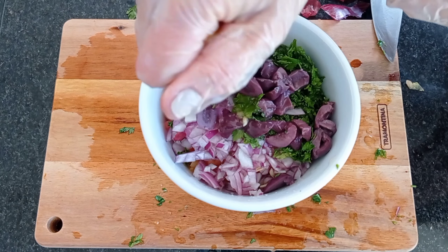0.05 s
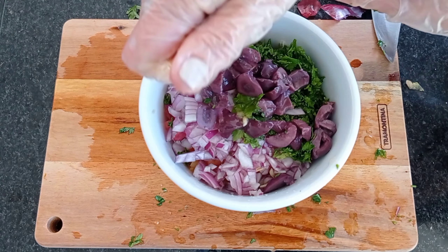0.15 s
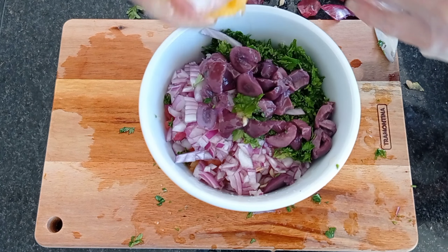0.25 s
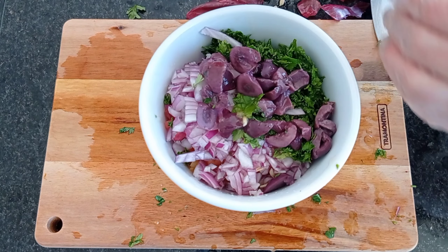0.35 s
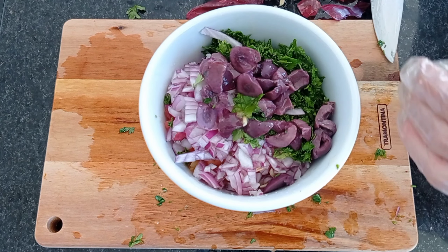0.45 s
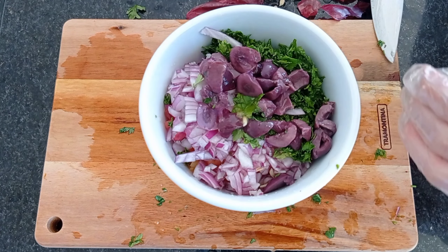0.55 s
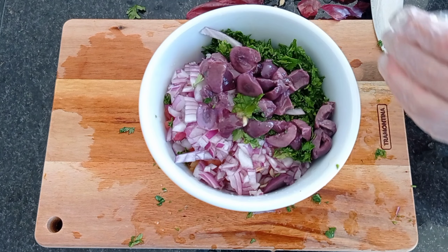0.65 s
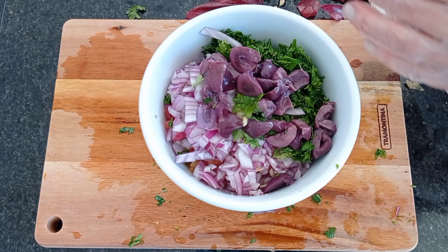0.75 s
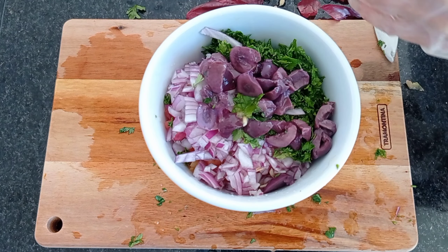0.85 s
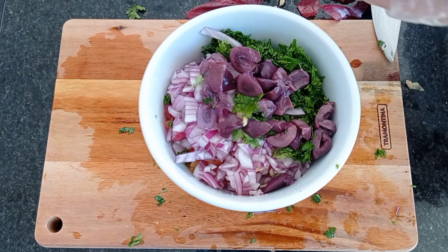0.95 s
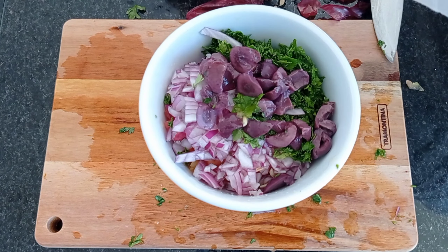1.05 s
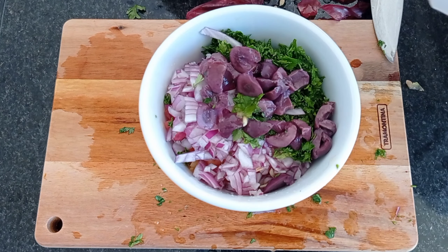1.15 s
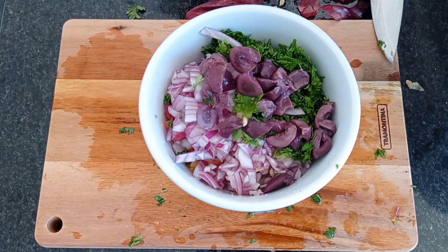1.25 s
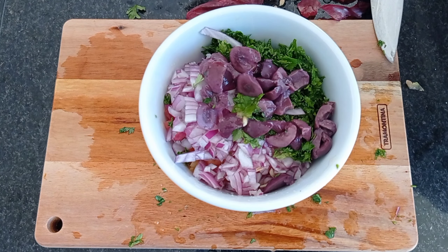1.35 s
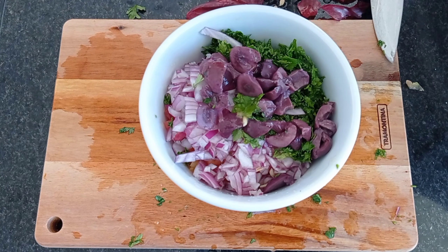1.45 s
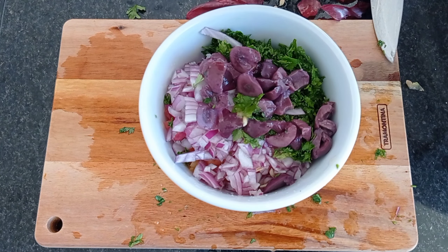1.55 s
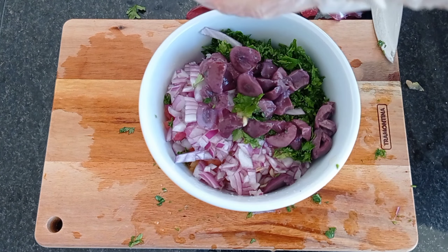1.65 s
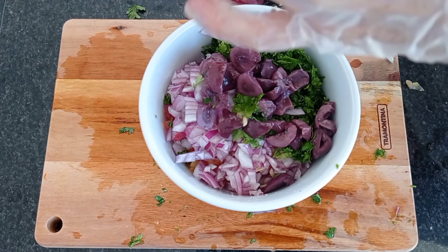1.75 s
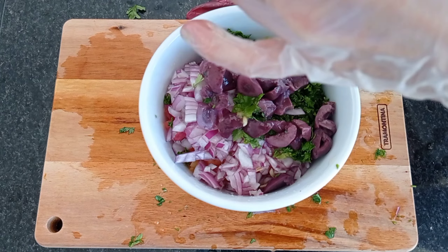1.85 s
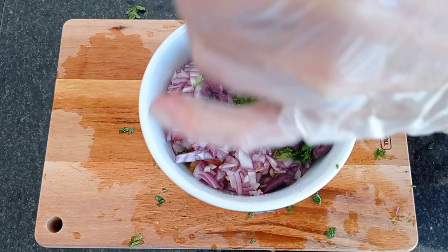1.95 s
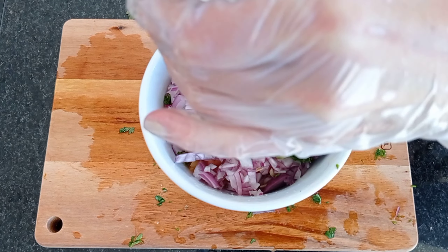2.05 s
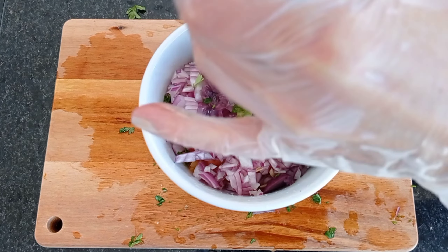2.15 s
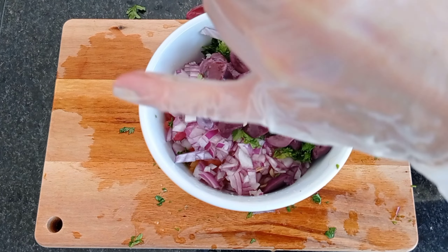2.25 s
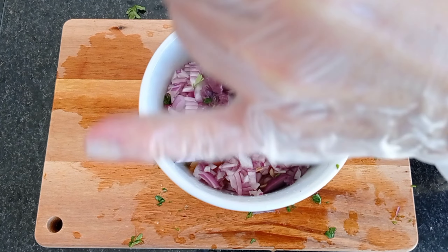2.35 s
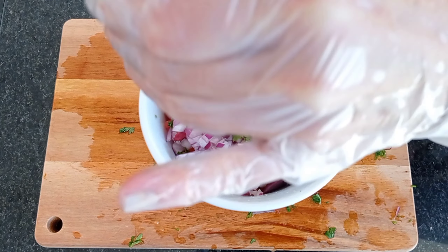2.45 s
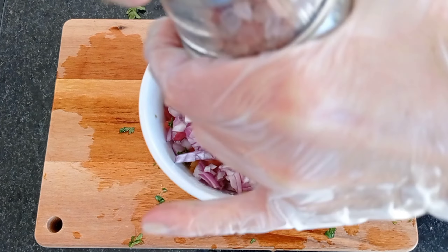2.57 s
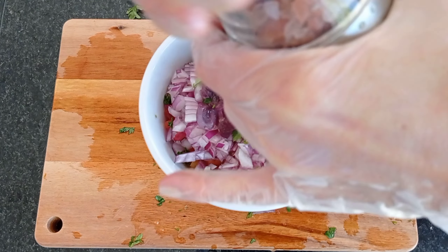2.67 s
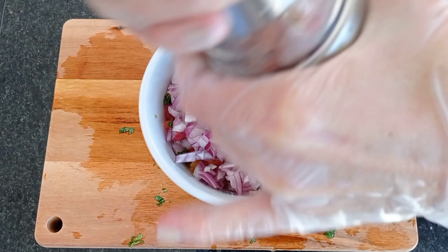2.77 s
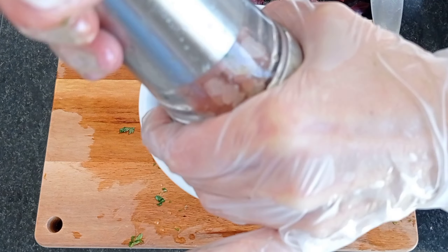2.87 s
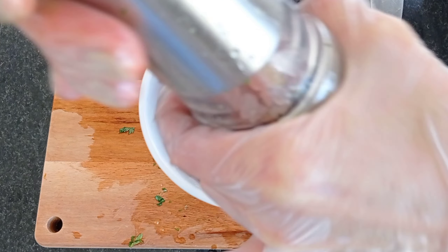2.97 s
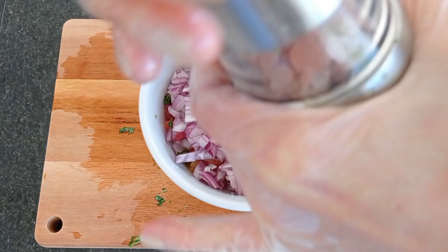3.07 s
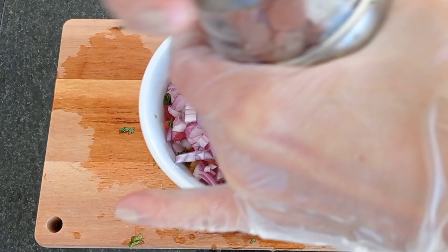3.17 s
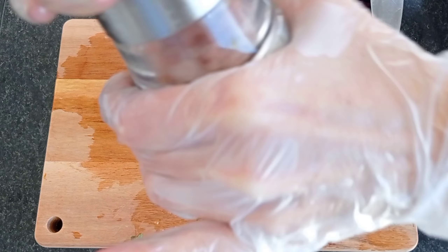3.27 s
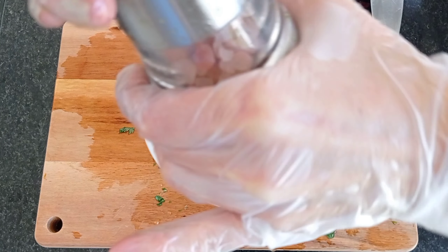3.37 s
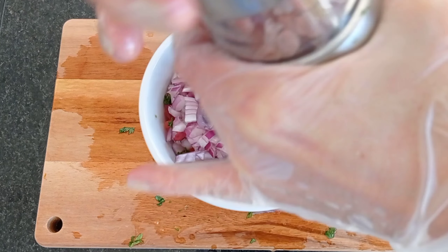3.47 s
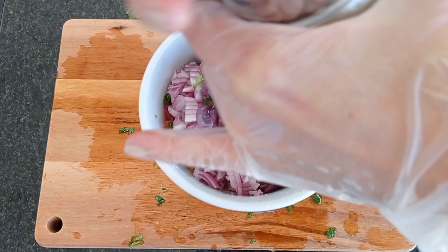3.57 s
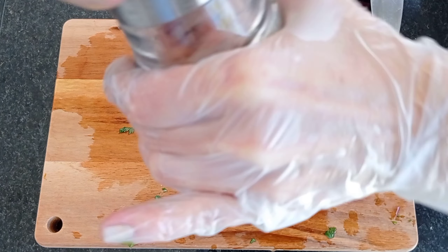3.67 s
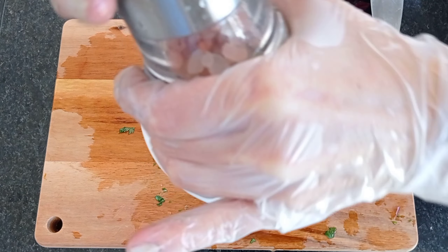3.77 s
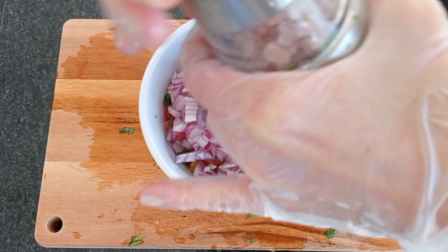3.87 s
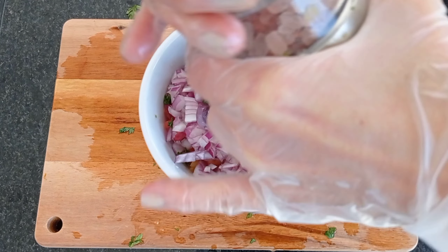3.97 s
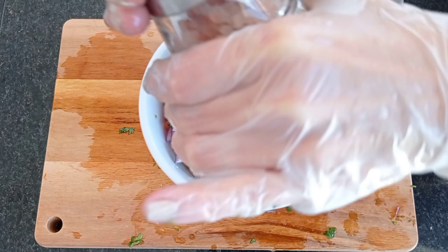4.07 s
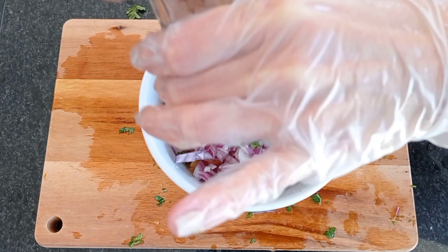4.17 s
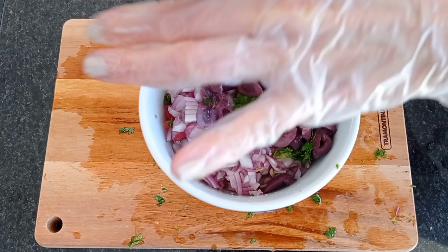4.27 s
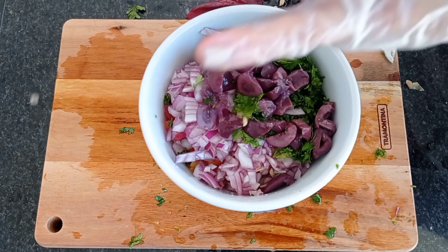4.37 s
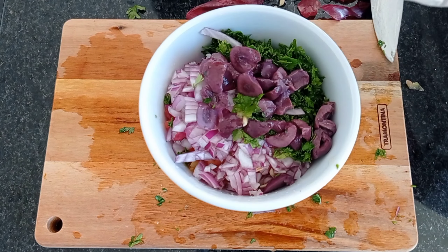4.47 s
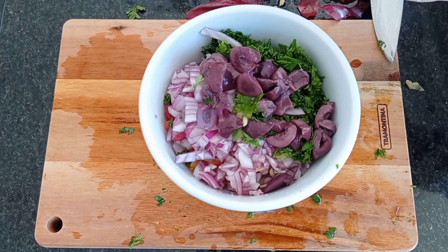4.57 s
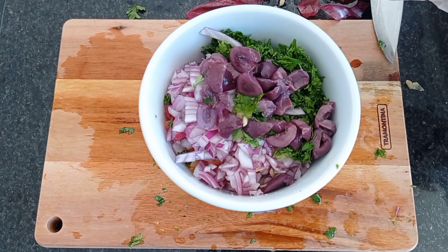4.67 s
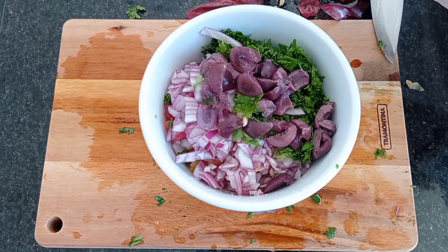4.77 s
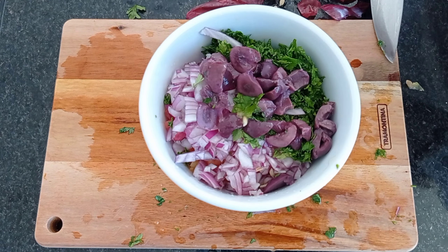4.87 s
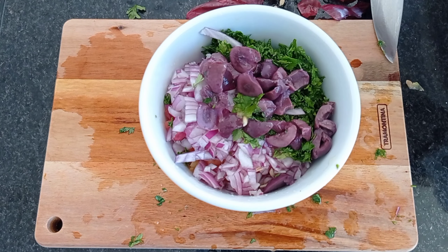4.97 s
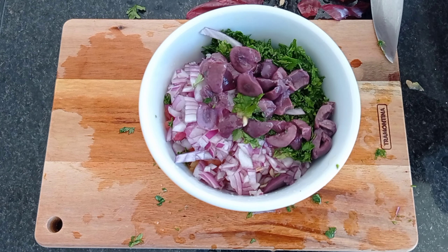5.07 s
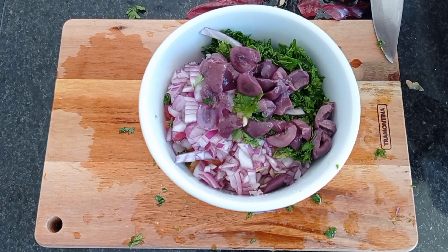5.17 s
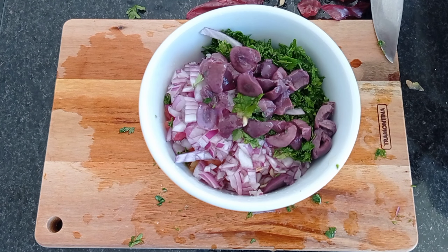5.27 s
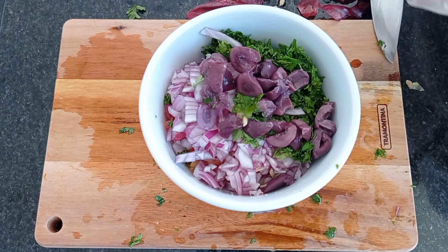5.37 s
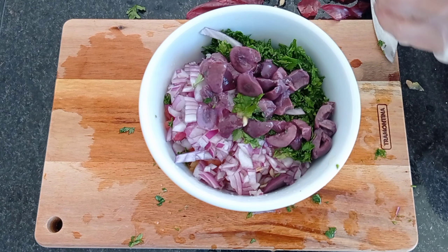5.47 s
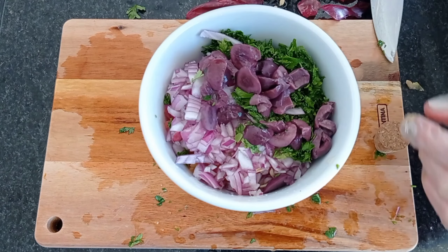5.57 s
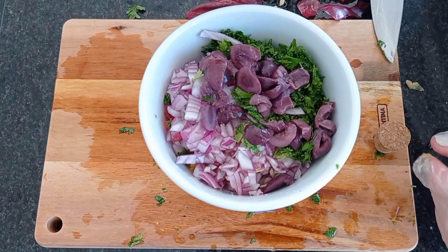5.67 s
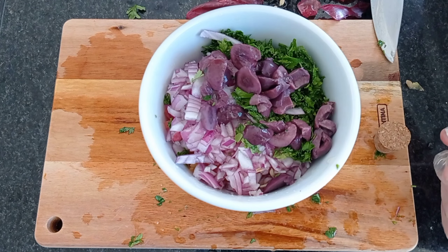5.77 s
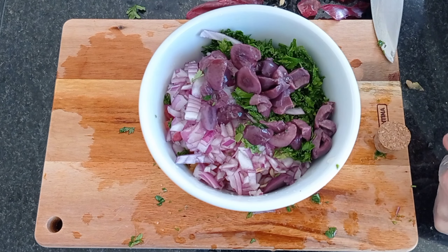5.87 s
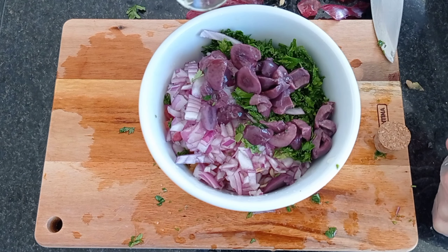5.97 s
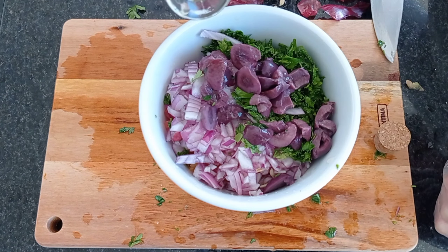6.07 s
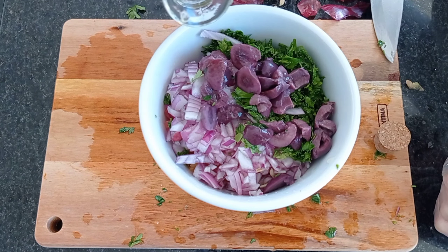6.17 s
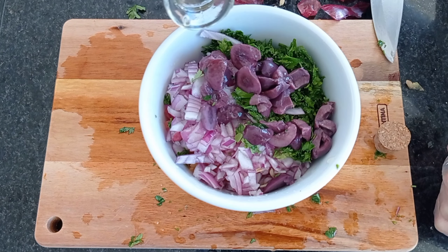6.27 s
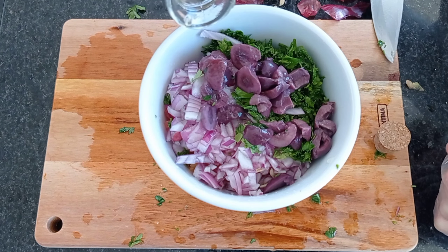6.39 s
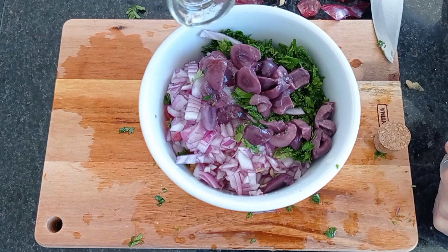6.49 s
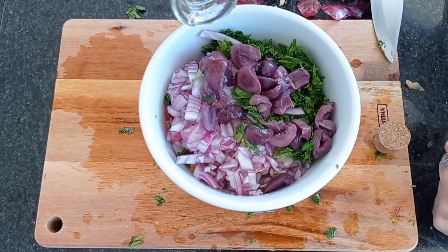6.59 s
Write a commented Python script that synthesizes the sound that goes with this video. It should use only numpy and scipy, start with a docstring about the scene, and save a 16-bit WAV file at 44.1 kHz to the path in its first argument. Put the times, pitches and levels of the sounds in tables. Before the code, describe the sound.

Gloved hands rustle and snap, uncap a salt mill with ringing clinks, twist it five times, then softly pop a cork.

```python
"""Salt mill at a kitchen counter

Close to a small covered microphone that hisses faintly, in a quiet kitchen, gloved hands pick up a salt mill,
pull off its ticking, ringing metal cap and give it five twists over a bowl; crystals crack between the burrs.
The thin plastic gloves rustle and snap as they crease, and squeak as they slip. At the end a cork pops from a
small bottle, which bumps the stone counter."""
import sys
import numpy as np
from scipy import signal
from scipy.fft import rfft, irfft
from scipy.io import wavfile

SR = 44100
rng = np.random.default_rng(int(sys.argv[2]) if len(sys.argv) > 2 else 0)


def wav_record(signal):
    """Record a signal, one row per channel, as 16-bit PCM in the file named by sys.argv[1]."""
    frames = np.transpose(np.atleast_2d(signal))
    bounded = np.clip(frames, -1, 1)
    # unit amplitude maps onto the largest positive 16-bit level
    quanta = np.round(bounded * 32767).astype(np.int16)
    wavfile.write(sys.argv[1], SR, quanta)


N = 292383
TIME = np.arange(N) / SR


def from_db(db):
    """Decibels to gain."""
    return 10 ** (np.asarray(db) / 20)


def rms_one(x):
    """Scale to rms 1."""
    return x / np.sqrt(np.mean(x ** 2) + 1e-20)


def coloured(x, spectrum):
    """Give a white signal a spectrum at rms 1; minimum phase keeps clicks from sounding early."""
    hz, level_db = np.transpose(spectrum)
    grid_hz = np.linspace(0, SR / 2, 2049)
    gain = from_db(np.interp(np.log(grid_hz + 1), np.log(hz), level_db))
    cepstrum = irfft(np.log(gain))
    cepstrum[1:2048] *= 2
    cepstrum[2049:] = 0
    impulse = irfft(np.exp(rfft(cepstrum)))
    return rms_one(signal.fftconvolve(x, impulse)[:N])


def ring(clicks, hz, t60):
    """A unit click sets a sine of height 1 ringing."""
    r, w = from_db(-60 / (t60 * SR)), 2 * np.pi * hz / SR
    return signal.lfilter([0, np.sin(w)], [1, -2 * r * np.cos(w), r * r], clicks + 1e-18)


def resonance(x, hz, width_hz):
    """Band-pass with gain 1 at its peak."""
    r, w = np.exp(-np.pi * width_hz / SR), 2 * np.pi * hz / SR
    return signal.lfilter(np.array([1, 0, -1]) * (1 - r * r) / 2, [1, -2 * r * np.cos(w), r * r], x)


def grains(per_s, spread_db):
    """Random clicks of uneven size."""
    sizes = from_db(spread_db * np.minimum(rng.exponential(1, N), 4)) * rng.choice([-1, 1], N)
    return rms_one(sizes * (rng.random(N) < per_s / SR))


def strikes(times, levels_db):
    """Clicks at given times."""
    clicks = np.zeros(N)
    clicks[np.round(np.asarray(times) * SR).astype(int)] = from_db(levels_db)
    return clicks


def flicker(per_s, depth_db):
    """A gain that wanders at random."""
    steps = from_db(depth_db * rng.standard_normal(int(per_s * N / SR) + 2))
    return np.interp(TIME * per_s, np.arange(len(steps)), steps)


def swell(start_s, end_s, swell_s, fade_s):
    """A gain that rises 20 dB per swell_s, holds 1 from start to end, then falls 20 dB per fade_s."""
    before = np.maximum(start_s - TIME, 0) / swell_s
    after = np.maximum(TIME - end_s, 0) / fade_s
    return from_db(-20 * (before + after))


# Noise floor of the microphone itself: f/Hz, relative level/dB
HISS_SPECTRUM = [(15, -32.5), (25, -15), (45, -2.5), (301, -10.5), (335, -11.5), (439, -17), (1400, -28.5),
                 (1610, -17), (1890, -22), (5570, -27), (12900, -19), (16000, -20)]
def hiss():
    """Steady noise, far below the hands."""
    return from_db(-73.5) * coloured(rng.standard_normal(N), HISS_SPECTRUM)


def room(x, t60=0.43, gap_s=0.003):
    """The kitchen walls return a dense, decaying tail after a short gap."""
    t = np.arange(SR // 2) / SR
    tail = rng.standard_normal(len(t)) * from_db(-60 * t / t60) * (t > gap_s)
    return signal.fftconvolve(x, tail / np.sqrt(np.sum(tail ** 2)))[:N]


# Hands never quite still: t/s, bright rustle/dB, dull rustle/dB, palm rub/dB
FIDGETING = [(0.0, -60, -70, -64.5), (1.14, -73, -76, -77), (1.33, -62, -49, -64), (1.64, -51.5, -55, -60),
             (2.05, -51.5, -50.5, -57.5), (2.2, -67, -60, -71), (2.51, -66.5, -80, -72),
             (2.86, -63, -61.5, -75.5), (3.03, -63.5, -76, -82), (3.6, -65.5, -77, -76.5),
             (3.97, -58.5, -75.5, -90), (4.67, -78.5, -82, -80), (5.0, -82.5, -80.5, -83),
             (5.22, -76, -79, -85), (5.47, -76, -85, -77.5), (5.89, -72.5, -77.5, -74.5),
             (6.09, -79.5, -82, -83.5), (6.63, -79, -81, -81)]
# Grasps and jolts: peak t/s, swell/s, fade/s, bright rustle/dB, dull rustle/dB, palm rub/dB
HAND_MOVES = [(.14, 0.013, 0.15, -42, -63, -62), (.24, 0.11, 0.043, -53, -68, -62),
              (.34, 0.06, 0.05, -71, -63, -76), (.658, 0.033, 0.14, -57.5, -68, -81),
              (.754, 0.14, 0.17, -99, -69, -58.5), (.89, 0.049, 0.19, -69, -73.5, -68.5),
              (1.127, 0.0086, 0.073, -55.5, -65, -54.5), (1.201, .005, 0.085, -34.5, -59, -44),
              (1.368, 0.019, 0.039, -37, -44, -50.5), (1.491, 0.0038, 0.093, -45, -43, -45.5),
              (2.035, 0.1, 0.16, -42.5, -41.5, -47.5), (2.189, 0.11, 0.043, -42, -40.5, -51),
              (2.322, 0.0037, 0.023, -64, -88, -42.5), (2.452, 0.076, 0.048, -39.5, -40, -54),
              (2.575, 0.0043, 0.081, -47.5, -60, -65), (2.77, 0.014, 0.044, -54, -61.5, -64),
              (2.92, 0.081, 0.043, -46, -70, -44), (3.197, 0.0061, 0.031, -49, -64, -41.5),
              (3.448, 0.0036, 0.041, -48, -59, -83), (3.31, 0.095, 0.17, -53, -71, -62.5),
              (3.728, 0.16, 0.057, -51, -63, -59.5), (3.99, 0.1, 0.034, -63, -92.5, -85),
              (4.098, 0.0084, 0.039, -40, -76, -35.5), (4.45, 0.014, 0.097, -97, -92, -67),
              (4.64, 0.3, 0.11, -95, -90, -63.5), (4.74, .15, 0.024, -91, -85, -70),
              (5.029, .004, 0.082, -51.5, -88, -39), (5.165, 0.11, 0.036, -75, -90, -56.5),
              (5.397, 0.16, 0.17, -65.5, -83, -86), (5.728, 0.11, 0.27, -74, -90, -66),
              (5.94, 0.054, 0.031, -61.5, -78, -65), (6.07, 0.16, 0.027, -72.5, -86, -76)]
def hands():
    """Fidgeting and grasping set three gains: bright rustle, dull rustle and palm rub."""
    times, *curves_db = np.transpose(FIDGETING)
    gains = from_db([np.interp(TIME, times, curve) for curve in curves_db])
    for s, swell_s, fade_s, *levels_db in HAND_MOVES:
        gains += from_db(levels_db)[:, None] * swell(s, s, swell_s, fade_s)
    return gains


def panels(clicks, low_hz, high_hz, cycles, patchy_db, tilt, count=9):
    """Clicks fall on small panels of glove film, each with its own pitch and its own busy moments."""
    dealt = rng.integers(0, count, N)
    out = np.zeros(N)
    for k, hz in enumerate(np.geomspace(low_hz, high_hz, count)):
        own_clicks = clicks * (dealt == k) * flicker(9, patchy_db)
        out += rms_one(ring(own_clicks, hz, cycles / hz)) * hz ** tilt
    return rms_one(out)


# Glove film rustling, close up: f/Hz, relative level/dB
FILM_SPECTRUM = [(530, -41.5), (900, -8), (1470, -24.5), (2330, 7), (2990, -4.5), (3280, -14.5),
                 (6460, 6.5), (9180, -24), (13500, -29.5)]
# Palms rubbing: f/Hz, relative level/dB
PALM_SPECTRUM = [(18, -49), (30, -24), (134, -6.5), (289, -16.5), (517, 5.5), (788, -13.5), (2000, -25),
                 (2600, -47.5), (4400, -120)]
def gloves(bright_gain, dull_gain, rub_gain):
    """Fine creases crackle densely in small and large panels of film; the palms rub underneath."""
    film_noise, palm_noise = rng.standard_normal((2, N))
    bright = panels(grains(6000, 3.5), 4100, 7300, cycles=31, patchy_db=4.5, tilt=0.34)
    dull = panels(grains(3000, 3.4), 1100, 3700, cycles=35, patchy_db=9.5, tilt=-0.022)
    rub = panels(grains(1500, 3), 170, 950, cycles=5.9, patchy_db=5, tilt=0.41)
    sheet = from_db(-8.5) * coloured(grains(1200, 3.6) + 1.5 * film_noise, FILM_SPECTRUM)
    palm = from_db(-8.5) * coloured(palm_noise, PALM_SPECTRUM)
    return bright_gain * (bright + sheet) + dull_gain * dull + rub_gain * (rub + palm)


def small_creases(rustle_gain, count=130):
    """Rows of t/s, level/dB, tilt/(dB/octave) for random snaps that follow the rustle's strength."""
    when, softness, brightness = rng.random((count, 3)).T
    times = 0.014 + when * (N / SR - 0.05)
    rustle_db = 20 * np.log10(rustle_gain[(times * SR).astype(int)])
    levels_db = np.minimum(rustle_db + 17.5, -38.5) - 8 * softness
    return list(zip(times, levels_db, 30 * (brightness - 0.5)))


# Sharp ticks: glove creases snapping, and the metal cap ticking as it slides off (about 1.5 to 2.2 s):
# t/s, level/dB, tilt/(dB/octave)
SHARP_TICKS = [(0.0793, -36, 15), (0.134, -32, 44), (0.2222, -30.5, 3), (0.3075, -37.5, -24),
               (0.3326, -40.5, -24), (1.1245, -32.5, 9), (1.165, -41, 3), (1.198, -13, -9),
               (1.3614, -28, -26), (1.3894, -29.5, -26), (1.4935, -16.5, -28), (1.519, -31, -23),
               (1.5657, -17.5, -11), (1.6599, -24.5, -20), (1.7471, -20.5, -14), (1.7654, -28.5, -3),
               (1.7964, -22.5, -25), (1.827, -24.5, -11), (1.8463, -34, -31), (1.8765, -26.5, -23),
               (1.9064, -22.5, -16), (1.9582, -26, -5), (1.9791, -21, -12), (1.998, -17.5, -47),
               (2.0452, -21, -6), (2.0774, -21, 5), (2.1394, -30, -19), (2.1693, -24, -2),
               (2.1786, -22, 13), (2.4443, -23.5, 0), (2.5225, -33, 11), (2.5461, -32.5, 10),
               (2.5705, -27, 12), (2.608, -30, 22), (2.6307, -30, 15), (2.674, -32.5, 28), (2.688, -41, 8),
               (2.7612, -35.5, -4), (2.8449, -31, -6), (2.925, -34, 12), (2.9455, -29, 7),
               (2.9577, -27, -36), (2.9906, -29.5, -12), (3.0104, -31, -8), (3.0895, -41.5, -5),
               (3.2006, -27, -3), (3.2745, -26, -4), (3.286, -24.5, -17), (3.3128, -28, -13),
               (3.3595, -22, 13), (3.41, -31, 1), (3.4492, -23.5, 1), (3.4624, -27.5, -16),
               (3.5064, -36, -13), (3.5286, -36.5, -9), (3.6605, -23, 28), (3.678, -32, 5),
               (3.7638, -23.5, 5), (3.801, -36.5, -4.5), (3.8139, -34.5, -12), (3.8972, -31.5, 15),
               (3.9216, -40, 20), (4.0151, -38, 21), (4.0886, -23, 2), (4.1005, -20, -7.5),
               (4.1928, -35.5, -2), (4.2132, -34.5, 10), (4.3844, -48.5, 5), (5.029, -22, -17),
               (5.1495, -40.5, 2), (5.9308, -42.5, -26)]
# Modes of a tick: f/Hz, relative level/dB, t60/s
TICK_MODES = [(1870, -16.5, 0.00037), (3640, 0, 0.0042), (4300, 1.5, 0.0016), (6080, 8, 0.0037),
              (6690, -4, 0.013), (9100, -9, .002)]
def ticks(rustle_gain):
    """Each tick, of a glove crease or the sliding cap, is a millisecond burst ringing brief modes."""
    rows = SHARP_TICKS + small_creases(rustle_gain)
    t, out = np.arange(400) / SR, np.zeros(N)
    band = signal.butter(2, [1800, 9000], "band", fs=SR, output="sos")
    for s, level_db, tilt in rows:
        burst = rng.standard_normal(len(t)) * np.exp(-t / 0.0013)
        modes = sum(from_db(mode_db + tilt * np.log2(hz / 4500) + rng.normal(0, 2)) * ring(burst, hz, t60)
                    for hz, mode_db, t60 in TICK_MODES)
        tick = signal.sosfilt(band, modes)
        out[round(s * SR):][:len(t)] += from_db(level_db - 1.5) * tick / np.abs(tick).max()
    return out


# Glove and glass slipping on smooth surfaces: t/s, length/s, f/Hz, level/dB, roughness (1 up: all noise)
SLIPS = [(.11, 0.076, 494, -48, 0.42), (0.182, 0.08, 422.7, -46, 0.35), (0.241, 0.082, 677, -57, 0.2),
         (0.494, 0.14, 680, -61, 0.5), (.735, 0.057, 139, -45.5, 0.06), (.76, 0.18, 522, -53.5, 0.64),
         (0.793, 0.1, 1109, -56, 0.54), (1.129, 0.029, 1073, -40.5, 0.2), (2.674, 0.084, 536, -52, 0.6),
         (2.689, 0.086, 934, -59.5, 0.86), (3.009, 0.02, 682, -71, 0.4), (3.526, 0.043, 274, -50.5, 0),
         (3.613, 0.043, 256, -47, 0.31), (3.777, 0.052, 591, -57, 0.26), (3.845, 0.04, 1032, -58.5, 0.3),
         (4.287, 0.04, 2270, -62, 0.36), (4.443, 0.016, 605, -39.5, 0), (4.462, 0.037, 972, -46, 0.2),
         (4.537, 0.048, 642, -54, 0), (4.5, 0.11, 990, -62, 0.1), (5.39, 0.037, 1950, -60, 0.2),
         (5.578, 0.086, 1720, -66, 1.1), (5.657, 0.076, 506, -61, 0), (5.716, 0.14, 2450, -70, 1.1),
         (5.706, 0.1, 4800, -65.5, 1.07), (5.887, 0.085, 1640, -61.5, 0.4), (5.962, 0.16, 1630, -66, 0.33)]
def squeaks(settle_samples=2000):
    """Stick-slip tones swell and fade, wavering in pitch; rough ones turn into noise around the pitch."""
    out = np.zeros(N)
    for s, length, hz, level_db, roughness in SLIPS:
        t = np.arange(round(length * SR)) / SR
        waver = 1 + 0.0087 * np.sin(2 * np.pi * (rng.uniform(11.4, 28) * t + rng.random()))
        tone = np.sin(2 * np.pi * hz * np.cumsum(waver) / SR)
        noise = rng.standard_normal(len(t) + settle_samples)
        band = resonance(resonance(noise, hz, 0.16 * hz), hz, 0.16 * hz)
        share = min(roughness, 1)
        squeak = (1 - share) * tone + share * rms_one(band[settle_samples:])
        out[round(s * SR):][:len(t)] += from_db(level_db) * np.sin(np.pi * t / length) * squeak
    return out


# The cork pops, then the bottle bumps the counter: t/s, level/dB, low-pass f/Hz, shiver decay/s
BOTTLE_BLOWS = [(5.025, -33.5, 6940, 0.052), (5.148, -37, 500, 0.034), (5.166, -29.5, 278, 0.0098)]
# Modes of the small bottle: f/Hz, level/dB, t60/s
BOTTLE_MODES = [(150, -30.5, 0.38), (240, -4.5, 0.11), (334, -1, 0.066), (597, -14.5, 0.039),
                (814, -3.5, 0.027), (1300, -22, .02), (1970, 1, 0.014), (2890, -12, 0.023),
                (3600, -3, 0.017), (3840, -4.5, 0.02), (4830, -6.5, 0.022), (6240, -24.5, .015),
                (6600, -9, 0.024), (7260, -10, 0.035)]
def bottle():
    """Each blow, a click and a dying shiver of small contacts dulled by its softness, rings the bottle."""
    t, blows = np.arange(9000) / SR, np.zeros(N)
    for s, level_db, cutoff_hz, shiver_s in BOTTLE_BLOWS:
        contacts = 0.036 * rng.standard_normal(len(t)) * np.exp(-t / shiver_s)
        contacts[0] = 1   # the click
        softened = signal.lfilter(*signal.butter(2, cutoff_hz, fs=SR), contacts)
        blows[round(s * SR):][:len(t)] += from_db(level_db) * softened
    return sum(from_db(level_db) * ring(blows, hz, t60) for hz, level_db, t60 in BOTTLE_MODES)


# Contact noise of mill and cap, also the colour of the crunch: f/Hz, relative level/dB
CONTACT_SPECTRUM = [(47, -53), (80, -34.5), (323, -24), (409, -12.5), (684, -1.5), (1250, -11.5),
                    (1680, -5.5), (2880, -11), (6790, -18.5), (8070, -25.5), (13500, -44.5)]
def puffs(times, levels_db, decay_s):
    """Each contact gives off a quickly dying puff of noise."""
    fading = signal.lfilter([1], [1, -np.exp(-1 / (decay_s * SR))], strikes(times, levels_db))
    return fading * coloured(rng.standard_normal(N), CONTACT_SPECTRUM)


# Mill and cap knocking in the palm: t/s, level/dB, f/Hz, t60/s
PALM_KNOCKS = [(1.136, -23, 412, 0.02), (1.638, -24.5, 238, 0.037), (1.999, -21, 1400, 0.031),
               (2.321, -27.5, 775, 0.05), (2.767, -36.5, 226, 0.049), (2.923, -13, 698, 0.03),
               (3.194, -26.5, 800, 0.024), (3.713, -19.5, 1700, 0.064), (4.101, -9.5, 1870, 0.012)]
def knocks():
    """A blow damped by the palm: a short ring, the hollow note of the air in the mill and a puff."""
    rings = sum(ring(strikes([s], [level_db - 8.5]), hz, t60) for s, level_db, hz, t60 in PALM_KNOCKS)
    times, levels_db = np.transpose(PALM_KNOCKS)[:2]
    hollow = ring(strikes(times, levels_db - 19.5), hz=390, t60=0.043)
    return rings + hollow + puffs(times, levels_db - 20.5, decay_s=0.01)


# Modes of the metal cap: f/Hz
CAP_PITCHES = [340, 662, 1063, 1685, 2277, 2585, 2767, 3058, 3521, 3957, 5087, 5938, 6363, 6578, 6966]
# The same modes in order: struck level/dB, dragged level/dB, t60/s
CAP_MODES = [(-22.5, -12.5, 0.25), (-23.5, -34, .2), (-9.5, -10.5, 0.1), (-8.5, -2, 0.7),
             (-23.5, -18.5, 0.057), (-6.5, 6.5, 0.042), (-25.5, -2, .4), (-24, -7, 0.6),
             (-14.5, -2.5, 0.18), (-22, -5.5, 0.78), (-25.5, -17.5, 0.19), (-20, -12.5, 0.14),
             (-16, -11.5, 0.17), (-17.5, -8, 0.15), (-16, -52, 0.12)]
# The cap catches as it slides along the mill: t/s, level/dB
CAP_CATCHES = [(1.366, -65.5), (1.57, -64.5), (1.66, -69.5), (1.704, -76), (1.747, -76), (1.827, -75),
               (1.906, -71.5), (1.98, -66), (2.18, -65)]
# The cap is struck: t/s, level/dB, time until fingers close on it/s
CAP_CLINKS = [(1.2, -15, 0.084), (1.3638, -39.5, 0.09), (1.4942, -14.5, 0.051)]
def cap(gripped_t60=0.12, damping_db_per_s=270):
    """Dragging chatters through the gripped cap; clinks ring it freely until fingers damp it."""
    edges = dict(swell_s=0.0072, fade_s=0.028)
    slide = from_db(-81) * swell(start_s=1.56, end_s=2.1, **edges)
    catches = sum(from_db(level_db) * swell(s, s, **edges) for s, level_db in CAP_CATCHES)
    chatter = (slide + catches) * (grains(900, 9.7) + 0.5 * rng.standard_normal(N))
    out = sum(from_db(dragged_db) * ring(chatter, hz, min(t60, gripped_t60))
              for hz, (_, dragged_db, t60) in zip(CAP_PITCHES, CAP_MODES))
    t = np.arange(SR // 2) / SR
    for s, level_db, free_s in CAP_CLINKS:
        modes = sum(from_db(struck_db + rng.normal(0, 1) - 60 * t / t60) * np.sin(2 * np.pi * hz * t)
                    for hz, (struck_db, _, t60) in zip(CAP_PITCHES, CAP_MODES))
        damping_db = damping_db_per_s * np.maximum(t - free_s, 0)
        out[round(s * SR):][:len(t)] += from_db(level_db - 7.5 - damping_db) * modes
    times, levels_db = np.transpose(CAP_CLINKS)[:2]
    return out + puffs(times, levels_db - 18, decay_s=0.013)


# Five twists over the bowl: bite t/s, hardest t/s, let-go t/s, crunch/dB, bright glove rustle/dB
MILL_TWISTS = [(2.387, 2.393, 2.57, -47.5, -71), (2.832, 2.916, 2.927, -32.5, -52),
               (3.267, 3.322, 3.351, -34, -49), (3.663, 3.714, 3.769, -34, -47),
               (4.086, 4.1, 4.124, -32, -56.5)]
def twists(onset_s=0.0022, drop_s=0.0035, trickle_s=0.054):
    """Gains of crunch and glove: burrs bite, the push builds and eases, then loose crystals trickle."""
    force, grip = np.zeros((2, N))
    for bite_s, hardest_s, end_s, crunch_db, grip_db in MILL_TWISTS:
        push_db = np.interp(TIME, [bite_s, hardest_s, end_s, end_s + drop_s], [-16, 0, -7.5, -13])
        force += from_db(crunch_db + push_db) * swell(bite_s, end_s + drop_s, onset_s, trickle_s)
        grip += from_db(grip_db) * swell(bite_s, end_s, onset_s, 3 * drop_s)
    return force, grip


# Resonances of the mill's body: f/Hz, width/Hz (rung at least 150 wide), relative level/dB
MILL_MODES = [(330, 22, -3), (694, 270, -24), (1700, 55, 14), (3250, 30, 5.5), (4810, 350, -25.5),
              (5330, 700, -6), (5350, 1100, -13), (6600, 230, -10.5)]
def mill(force):
    """Crystals crack between the burrs; the cracks ring the body of the mill."""
    cracks = (grains(1500, 6.3) + 0.5 * rng.standard_normal(N)) * flicker(120, 1.7)
    body = sum(from_db(level_db) * np.sqrt(width) * rms_one(resonance(cracks, hz, max(width, 150)))
               for hz, width, level_db in MILL_MODES)
    return force * (from_db(-2.5) * rms_one(body) + from_db(-3) * coloured(cracks, CONTACT_SPECTRUM))


def microphone(x, port_hz=15100, width_hz=1500):
    """A small capsule behind a cover loses bass and treble; its port resonates high up."""
    capsule = signal.butter(2, [110, 8500], "band", fs=SR, output="sos")
    port = resonance(resonance(x, port_hz, width_hz), port_hz, width_hz)
    return signal.sosfilt(capsule, x) + from_db(7.5) * port


# Brief dips in the overall level: centre t/s, length/s, depth/dB
LEVEL_DIPS = [(1.062, 0.015, -24), (4.777, 0.044, -2), (4.915, 0.35, -5), (4.94, 0.023, -5.5),
              (5.568, 0.032, -13)]
def dips():
    """A gain with smooth, flat-bottomed dips."""
    return from_db(sum(depth_db * np.exp(-(2 * (TIME - s) / length) ** 4)
                       for s, length, depth_db in LEVEL_DIPS))


def scene():
    """Hands, bottle and mill close to one microphone, with a little of the kitchen behind them."""
    force, grip = twists()
    bright, dull, rub = hands()
    bright += grip
    blows = ticks(bright) + cap() + knocks() + bottle()
    crunch = mill(force)
    tail = from_db(-12) * room(blows + from_db(-7) * crunch)
    sound = blows + crunch + tail + gloves(bright, dull, rub) + squeaks()
    return ((microphone(sound) + hiss()) * dips())[None]


def record(dry):
    """A steep low-pass, 60 dB down at 16.5 kHz."""
    return signal.sosfilt(signal.cheby2(12, 60, 16500, fs=SR, output="sos"), dry)


dry = scene()
out = record(dry)
wav_record(out)
```